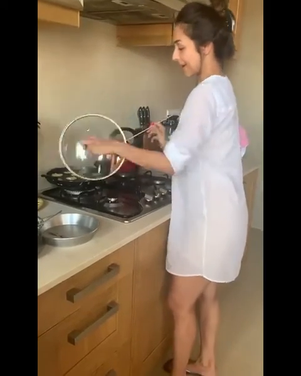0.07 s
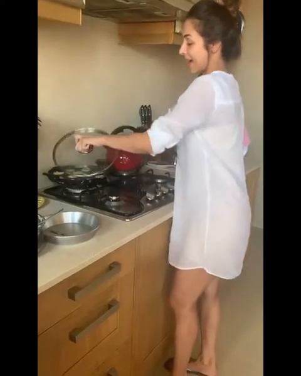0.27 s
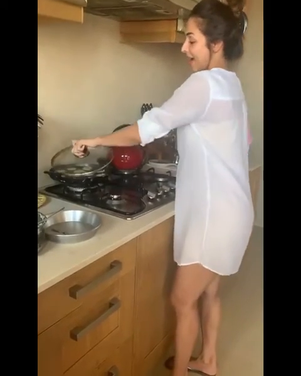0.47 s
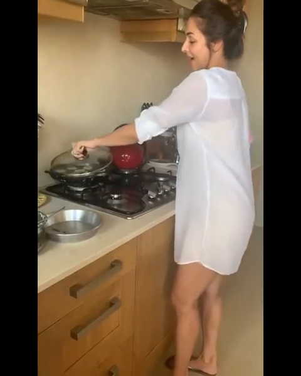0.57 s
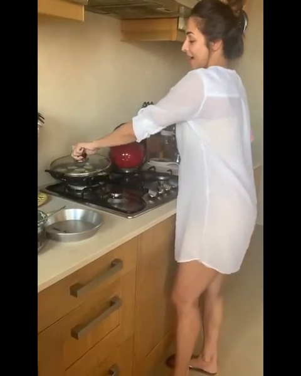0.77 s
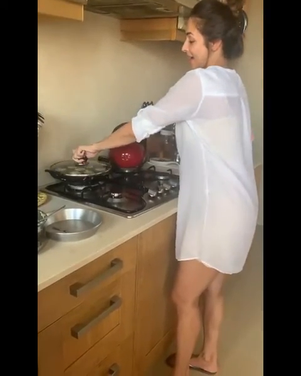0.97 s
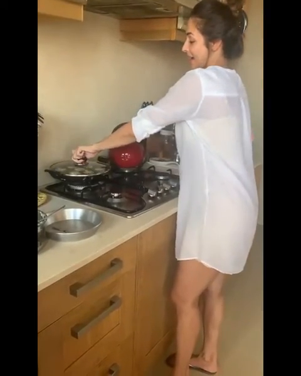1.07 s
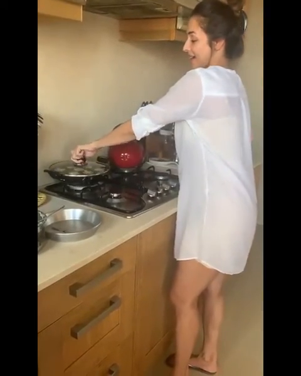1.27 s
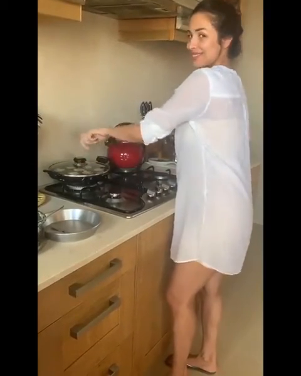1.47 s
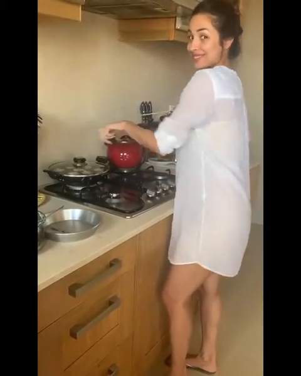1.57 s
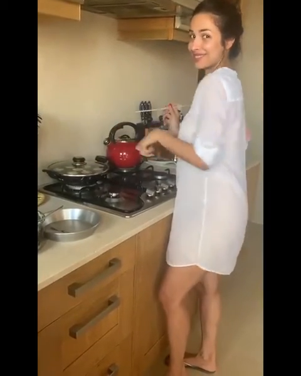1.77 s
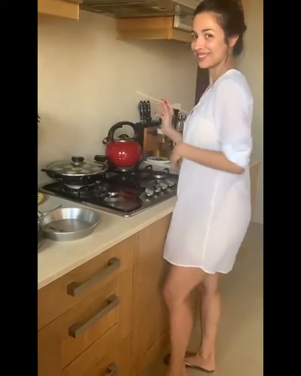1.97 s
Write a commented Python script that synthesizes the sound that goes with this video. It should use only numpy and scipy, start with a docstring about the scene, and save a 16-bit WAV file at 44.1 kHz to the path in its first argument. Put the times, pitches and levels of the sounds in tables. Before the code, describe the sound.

Food sizzles in a hot pan, then a glass lid clatters shut and muffles it.

```python
"""Batter sizzles in a hot pan on a gas burner in a small kitchen, as tiny steam bubbles burst.
A glass lid is lowered: it grazes the rim, knocks, then clatters shut. Each impact excites the
damped modes of lid and pan, and the lid becomes a barrier that muffles the sizzle.
Two soft bumps follow, and the rush of the burner is left, with a hollow tone and airy whistles."""
import sys
import numpy as np
from scipy import signal
from scipy.fft import rfft, irfft
from scipy.io import wavfile

SR = 44100
rng = np.random.default_rng(int(sys.argv[2]) if len(sys.argv) > 2 else 0)


def inscribe(sig):
    """Save sig as 16-bit PCM at rate SR to the path in sys.argv[1].

    A 1-D sig is mono; a 2-D sig holds one channel per row.
    Samples are clipped to [-1, 1] before scaling.
    """
    pcm = np.round(np.clip(np.atleast_2d(sig).T, -1, 1) * 32767)
    wavfile.write(sys.argv[1], SR, pcm.astype(np.int16))


N = 88508


def amp(db):
    """Amplitude grows tenfold every 20 dB."""
    return 10 ** (np.asarray(db) / 20)


def unit(x):
    """Normalisation to rms 1."""
    return x / np.sqrt(np.mean(x ** 2) + 1e-20)


def at_hz(table, hz):
    """Interpolation on a logarithmic frequency axis."""
    f, values = np.transpose(table)
    return np.interp(np.log(hz + 1), np.log(f + 1), values)


def at_time(table, t):
    """Linear interpolation in time."""
    return np.interp(t, *np.transpose(table))


def add(mix, start_s, sound):
    """Superposition: a sound adds to the mix from its start time."""
    part = mix[:, max(round(start_s * SR), 0):][:, :sound.shape[1]]
    part += sound[:, :part.shape[1]]


def colour(x, db_of):
    """Time-invariant filtering by a function from Hz to dB."""
    n = x.shape[-1]
    return irfft(rfft(x, 2 * n) * amp(db_of(np.fft.rfftfreq(2 * n, 1 / SR))))[..., :n]


def shape(x, db_of, size=256):
    """Time-varying filtering by a function from (Hz, seconds) to dB."""
    frames = dict(fs=SR, nperseg=size, noverlap=size * 3 // 4)
    hz, t, spectra = signal.stft(x, **frames)
    return signal.istft(spectra * amp(db_of(hz[:, None], t)), **frames)[1][:, :x.shape[1]]


def noise(db_of, n):
    """Filtered white noise of rms 1, in sum and difference channels."""
    return unit(colour(rng.standard_normal((2, n)), db_of))


def band_noise(hz, octaves, n):
    """Band-pass noise, 6 dB down at the given octaves either side of its centre."""
    return noise(lambda f: -6 * (np.log2((f + 1) / hz) / octaves) ** 2, n)


def drift(rows, columns, size):
    """Random modulation: noise smoothed into patches, rms 1."""
    window = np.outer(np.hanning(size), np.hanning(size))
    return unit(signal.fftconvolve(rng.standard_normal((rows, columns)), window, "same"))


def peak_db(f, hz, width_hz):
    """A resonance curve, 6 dB down at width_hz either side of its peak."""
    return -20 * np.log10(1 + ((f - hz) / width_hz) ** 2)


def strike(t, rise_s, t60):
    """Damping: after a quick rise, the amplitude decays by 60 dB in t60 seconds."""
    return (1 - np.exp(-t / rise_s)) * np.exp(-np.log(1000) * t / t60)


def sizzle():
    """Shot noise of bursting steam bubbles over a fine fizz; as a barrier the lid shades treble most."""
    # The open pan. Each row: frequency in Hz, relative spectral level in dB.
    spectrum = [(200, -35), (900, -15), (1800, -12), (2500, 1), (3500, -5.5), (4500, -0.5), (6200, 0.5),
                (7600, 0.5), (9400, 2)]
    # Sizzle passing the lid. Each row: time in seconds, gain in dB.
    opening = [(0, 4.5), (.09, 5), (.32, 2), (.54, -3.5), (.62, 0.5), (.76, -1), (.95, -5.5), (1.08, -11.5),
               (1.25, -19), (1.31, -11.5), (1.55, -21.5), (1.62, -15.5), (1.7, -23), (2.0, -26)]
    # Each row: frequency in Hz, share of that gain in dB that applies there.
    shading = [(500, 0.3), (2000, 0.23), (3200, 0.81), (5000, 0.83), (9000, 1.0)]
    pops_per_s, flutter_db, patchy_db = 1700, 1.06, 2

    def escaping_db(f, t):
        flutter = flutter_db * drift(1, len(t), size=31)
        patches = patchy_db * drift(len(f), len(t), size=9)
        return at_time(opening, t) * at_hz(shading, f) + flutter + patches

    sizes = amp(-2 * np.minimum(rng.exponential(1, N), 4))
    bursts = rng.random(N) < pops_per_s / SR
    pops = unit(sizes * bursts * rng.choice([-1, 1], (2, N)))
    fizz = amp(7.5) * rng.standard_normal((2, N))
    open_pan = amp(-34.5) * unit(colour(pops + fizz, lambda f: at_hz(spectrum, f)))
    return shape(open_pan, escaping_db)


def burner():
    """The flame rushes as broadband noise, unevenly modulated in time and frequency."""
    # Each row: frequency in Hz, relative spectral level in dB.
    spectrum = [(20, -32), (32, -14.5), (46, 1), (85, 2), (135, -4.5), (185, -2), (270, -6.5), (420, -9.5),
                (650, -11.5), (950, -7.5), (1200, -10), (1500, -6.5), (2100, -10.5), (2600, -19.5),
                (3200, -24), (9000, -33.5)]
    patchy_db = 2.28
    rush = noise(lambda f: at_hz(spectrum, f), N)
    return amp(-45.5) * shape(rush, lambda f, t: patchy_db * drift(len(f), len(t), size=13), size=1024)


def hollow_tone():
    """A noise-driven resonance in the rush rises in pitch as the lid closes, then sinks back."""
    # Each row: time in seconds, resonant frequency in Hz.
    pitch = [(0, 910), (.9, 833), (1.4, 1000), (1.9, 880)]
    white = rng.standard_normal((2, N))
    tone = shape(white, lambda f, t: peak_db(f, at_time(pitch, t), width_hz=76), size=2048)
    return amp(-53.5) * unit(tone)


def whistles():
    """Narrow resonances pick airy whistles out of noise; they swell late on."""
    # Each row: centre in Hz, half-width in Hz, level in dB before the swell.
    resonances = [(1882, 99, -51), (2390, 40, -71)]
    # Each row: time in seconds, gain in dB.
    swell = [(0, -3.5), (1.0, -3.5), (1.35, 1), (1.6, -6.5), (1.78, -4), (1.88, 4), (2.0, 5.5)]
    airy = sum(amp(db) * noise(lambda f: peak_db(f, hz, width), N) for hz, width, db in resonances)
    return airy * amp(at_time(swell, np.arange(N) / SR))


def steam_spurts():
    """Steam escapes from the batter in brief swells of band-limited noise."""
    # Each row: start in seconds, length in seconds, level in dB, centre in Hz.
    spurts = [(0.031, 0.091, -35.5, 4050), (0.189, 0.018, -46, 6760), (0.271, 0.08, -34.5, 8900)]
    out = np.zeros((2, N))
    for start, length, db, hz in spurts:
        n = int(length * SR)
        add(out, start, amp(db) * np.hanning(n) * band_noise(hz, octaves=0.85, n=n))
    return out


def lid_ring(t, seated, tilt_db):
    """Free vibration of lid and pan is a sum of decaying modes; the hand adds damping until it seats."""
    # Each row: frequency in Hz, level in dB when tilted, level in dB when seated, t60 in seconds.
    modes = [(204.2, -7, -2.5, 0.15), (272.7, -14, 1.5, 0.15), (314.4, -5, -2.5, 0.23),
             (433.4, 3.5, 4, 0.17), (531.5, -12, -6.5, 0.23), (570, -1.5, -10, 0.23),
             (640.6, -8, -12.5, 0.35), (920, 2.5, -1.5, 0.088), (1288, -8, -9.5, 0.18),
             (1404, -5.5, -5.5, 0.15), (1449.7, -12.5, 0, 0.11), (1794, -24, -12, 0.092),
             (1837, -18.5, -28, 0.36), (2460, -13, -14, 0.36), (2707, -12.5, -20, 0.25),
             (2993, -11, -9.5, 0.082), (3460, -11.5, -36, 0.11), (4020, -13, -9.5, .04)]
    t60_share = 1 if seated else 0.89
    detunes = 1 + 0.0046 * rng.standard_normal(len(modes))
    phases = np.array([[0], [np.pi / 2]])  # sum and difference in quadrature
    ring = np.zeros((2, len(t)))
    for (hz, held_db, seated_db, t60), detune in zip(modes, detunes):
        gain = amp((seated_db if seated else held_db) + tilt_db(hz))
        envelope = strike(t, rise_s=0.001, t60=t60 * t60_share)
        ring += gain * np.sin(2 * np.pi * hz * detune * t + phases) * envelope
    return ring


def thump(hz, octaves, t60):
    """Heavy damping spreads a dull knock over a band around one pitch."""
    t = np.arange(SR // 2) / SR
    envelope = strike(t, rise_s=0.0027, t60=t60)
    return unit(band_noise(hz, octaves, len(t)) * envelope) * np.sqrt(np.mean(envelope ** 2))


def lid_contact(seated, brightness, thud_db):
    """Impact excitation: lid on pan gives ringing, a dry clack, a tick and a thud into the hob."""
    # Each row: frequency in Hz, relative spectral level in dB.
    clack_spectrum = [(60, -17.5), (200, -10), (400, 8), (750, -0.5), (1450, -7.5), (2000, -13),
                      (3000, -15), (4400, -23), (6000, -35.5), (9500, -53)]
    pivot_hz = 696
    t = np.arange(SR // 2) / SR

    def tilt_db(f):
        return brightness * np.log2(np.clip(f, 150, 4000) / pivot_hz)

    ring = lid_ring(t, seated, tilt_db)
    clack = colour(noise(lambda f: at_hz(clack_spectrum, f), len(t)), tilt_db)
    clack *= strike(t, rise_s=0.00026, t60=0.037)
    tick = colour(rng.standard_normal((2, len(t))), tilt_db) * strike(t, rise_s=0.0001, t60=0.0075)
    thud = thump(hz=91.6, octaves=0.3, t60=0.22)
    return amp(-29) * ring + amp(-20.5) * clack + amp(-52) * tick + amp(thud_db - 27) * thud


def lid_clatter():
    """A train of impacts on the rim, first with the lid tilted, then with it lying flat."""
    # Each row: start in seconds, gain in dB, brightness in dB per octave, extra thud gain in dB.
    contacts = [(0.587, -18, 5.5, -42), (0.602, -16.5, 1.5, -17), (.737, -16.5, 3, -26),
                (.748, -16, 5.5, -27), (0.801, -19.5, -2, 3), (.925, -3.5, 1, -27), (.935, -6.5, -0.5, -34),
                (.943, -12, -2.5, -2.5), (.971, -13, 0, -21), (.990, -12, -4, -22), (1.017, -20.5, -5, 8),
                (1.095, -7, 4.5, -21), (1.101, -2.5, 1, -6), (1.110, -3, 0, -9.5), (1.119, -6.5, 1, -5),
                (1.127, -9.5, -3.5, -12), (1.136, -10.5, -1.5, -22), (1.164, -14, 1.5, 1),
                (1.186, -15.5, 2.5, 11.5), (1.237, -17.5, 3, 6)]
    seated_s = 1.05
    out = np.zeros((2, N))
    for start, db, brightness, thud_db in contacts:
        add(out, start, amp(db) * lid_contact(start > seated_s, brightness, thud_db))
    return out


def soft_bumps():
    """Low, heavily damped knocks sound as the lid grazes the rim and again after it has shut."""
    # Each row: start in seconds, level in dB, centre in Hz, t60 in seconds.
    bumps = [(0.666, -41.5, 72.6, 0.29), (0.634, -47.5, 276, 0.24), (0.744, -36, 298, .12),
             (1.439, -33, 316, 0.089), (1.444, -37, 88.5, 0.12), (1.504, -31, 268, 0.072)]
    out = np.zeros((2, N))
    for start, db, hz, t60 in bumps:
        add(out, start, amp(db) * thump(hz, octaves=0.58, t60=t60))
    return out


def kitchen(x, wet_db):
    """Reverberation: a short diffuse tail whose decay rate depends on frequency."""
    # Each row: frequency in Hz, reverberation time (t60) in seconds.
    decay = [(100, 0.25), (500, 0.46), (2000, 0.22), (8000, 0.43)]
    t = np.arange(SR // 2) / SR
    tail = shape(rng.standard_normal((2, len(t))), lambda f, s: -60 * s / at_hz(decay, f))
    tail *= t > 0.005  # delay of the first reflection
    return x + amp(wet_db) * signal.fftconvolve(x, tail / np.linalg.norm(tail[0]), axes=1)[:, :N]


def stereo(both):
    """Mid-side stereophony: sum and difference channels combine into left and right."""
    # Each row: frequency in Hz, gain of side over mid in dB.
    width = [(70, -57), (170, -19.5), (350, -10), (650, 0), (1000, -1), (1400, -5.5), (2000, -2.5),
             (3000, 1.5), (4000, -1), (4550, 1.5), (4850, 22), (5200, 20), (5500, 18.5), (5800, 1.5),
             (6600, 0), (7400, -9.5), (8100, -59)]
    # Each row: frequency in Hz, gain of left over right in dB.
    balance = [(70, 1), (180, -2), (400, -2), (1000, 0.4), (9000, 0)]
    mid = colour(both[0], lambda f: -10 * np.log10(1 + amp(at_hz(width, f)) ** 2))
    side = colour(both[1], lambda f: -10 * np.log10(1 + amp(-at_hz(width, f)) ** 2))
    left_right = np.array([mid + side, mid - side])
    return colour(left_right, lambda f: np.outer([0.5, -0.5], at_hz(balance, f)))


def scene():
    """Pan, burner and lid superpose in the kitchen."""
    knocks = lid_clatter() + soft_bumps()
    frying = kitchen(sizzle() + steam_spurts(), wet_db=-6.5)
    rush = burner() + hollow_tone() + whistles()
    narrowing = np.array([[1], [amp(-3.5)]])  # weakens the difference channel
    return stereo(frying + rush + kitchen(knocks, wet_db=-2.5) * narrowing)


def record(dry):
    """Band limiting: a steep low-pass filter removes the highest treble."""
    cutoff_hz = 9690
    low_pass = signal.firwin(801, cutoff_hz, window=("kaiser", 9), fs=SR)
    return signal.oaconvolve(dry, low_pass[None], "same")


dry = scene()
out = record(dry)
inscribe(out)
```